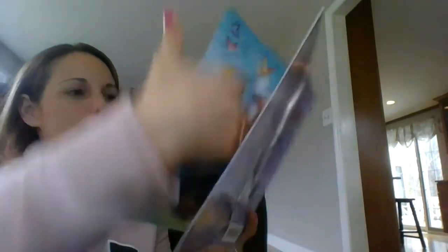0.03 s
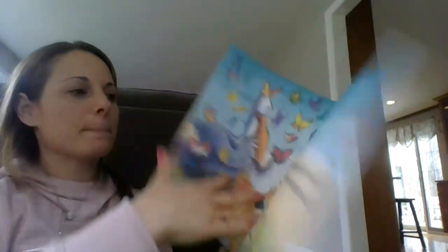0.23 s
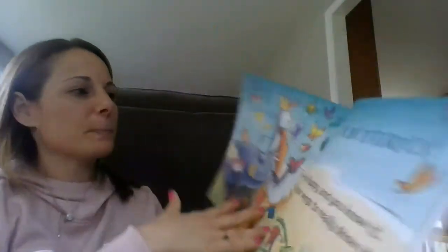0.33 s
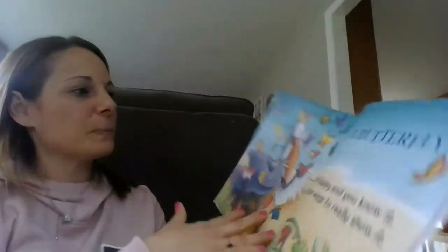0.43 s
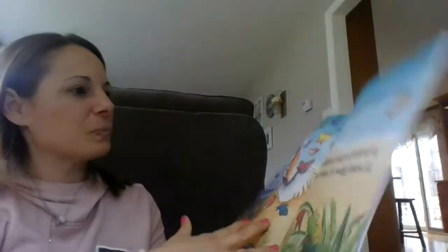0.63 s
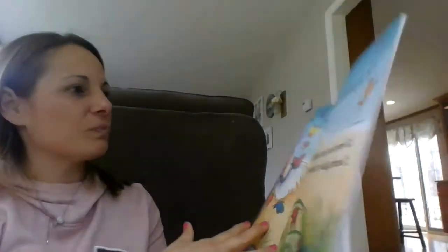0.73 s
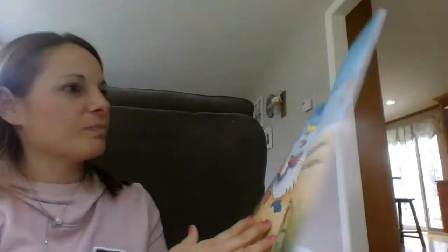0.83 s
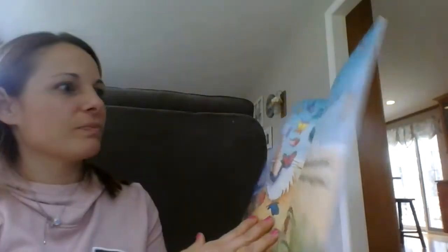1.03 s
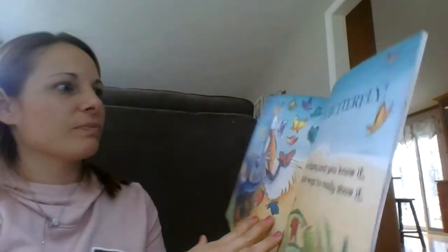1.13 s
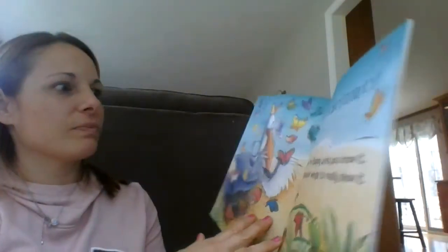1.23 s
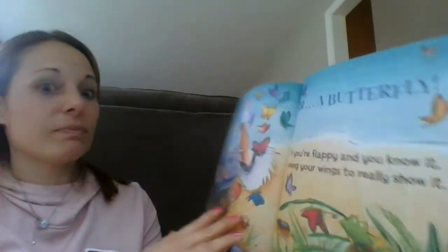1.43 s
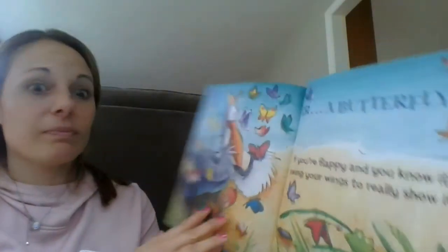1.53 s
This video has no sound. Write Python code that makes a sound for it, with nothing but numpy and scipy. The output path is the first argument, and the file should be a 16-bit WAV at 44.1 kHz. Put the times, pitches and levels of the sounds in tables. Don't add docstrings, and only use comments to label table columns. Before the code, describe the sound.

A stiff, glossy picture-book page turns close to a laptop microphone. Soft crinkling begins at once as it lifts, swelling from 0.2 seconds to a sharp, loud snap near 0.27, with more crackles until it lands with a crisp click at 0.43. By 0.6 only faint palm slides remain, with a light hollow fingertip tap at 0.93 and soft brushes near 1.2 and 1.5, over faint low room rumble.

```python
import sys
import numpy as np
from scipy import signal
from scipy.fft import rfft, irfft, next_fast_len
from scipy.io import wavfile
from scipy.ndimage import uniform_filter1d, map_coordinates

SR = 44100
rng = np.random.default_rng(int(sys.argv[2]) if len(sys.argv) > 2 else 0)


def master(y):
    cut = np.clip(np.atleast_2d(y).T, -1, 1)
    pcm = np.round(cut * 32767)
    wavfile.write(sys.argv[1], SR, pcm.astype(np.int16))


def ratio_of_db(decibels):
    return 10 ** (np.asarray(decibels, float) / 20)


N = 70560

# time_s, level_db
LIFT_BEND = [
    (0.0, -65),
    (0.008, -57.5),
    (0.044, -45),
    (0.072, -51.5),
    (0.084, -53),
    (0.09, -46),
    (0.12, -44.5),
    (0.15, -47),
    (0.19, -55.5),
]
# time_s, level_db
FLIP_BEND = [
    (.19, -51.5),
    (.225, -40),
    (.25, -35),
    (.29, -40),
    (.33, -36.5),
    (.365, -42),
    (.418, -51.5),
    (.452, -46),
    (.57, -100),
]
# freq_hz, level_db
SHEET_SPECTRUM = [(150, -13.5), (300, 4), (750, -2.5), (1450, -6), (2400, 2.5), (4000, -8), (6500, -23),
                  (9000, -33.5)]
GRAINS_PER_S, GRAIN_SPREAD_DB, CLUMP_DB, WASH_DB = 1800, 2.5, 1, -3.5
GRAIN_HZ, GRAIN_OCTAVES, GRAIN_CYCLES = 1356, .4, 3.4
SHEET_FLOOR_HZ = 254.6

# freq_hz, level_db_per_hz
HUM_SPECTRUM = [(18, -33), (30, -11), (108, -7), (256, -19.5), (420, -19), (1360, -25.5), (1720, -20.5),
                (15500, -42.5)]
HUM_DB, HUM_SWING_DB = -81, 1.2
# time_s, level_db
WEIGHT_SHIFT = [(0.0, -68), (0.088, -76), (0.12, -63.5), (0.294, -61.5), (0.356, -72), (0.404, -65.5),
                (0.494, -64), (0.524, -69.5), (0.636, -79.5), (0.676, -70.5), (0.9, -80), (0.958, -71.5),
                (1.078, -81), (1.234, -68.5), (1.3, -87.5), (1.344, -72), (1.368, -99), (1.6, -84.5)]
# freq_hz, level_db
THUD_SPECTRUM = [(20, -13.5), (50, -6.5), (100, -4.5), (150, -14.5), (250, -15), (500, -22), (1200, -25),
                 (2500, -60)]

# full_speed_s, rise_s, fall_s, hiss_db, hold_s
STROKES = [(.01, 0.011, 0.07, -53, 0.099), (0.154, 0.11, 0.0199, -46, 0.012),
           (0.283, 0.091, 0.15, -40, 0.056), (0.4297, .001, .005, -45, 0.0011),
           (0.441, 0.015, 0.0034, -42, .005), (0.472, 0.015, 0.23, -71.5, .01),
           (0.611, 0.041, 0.11, -50, .04), (0.815, 0.039, .11, -57, 0.008),
           (0.941, 0.042, 0.034, -67, 0.089), (1.072, .05, 0.044, -81, .09),
           (1.2, 0.035, 0.13, -55.5, .045), (1.305, .07, 0.03, -57.5, 0.025),
           (1.354, 0.025, 0.17, -69, 0.023), (1.515, 0.085, .1, -52.5, .04), (1.6, 0.049, .1, -62, .01)]
SLOPE_DB, EDGE = 20, 1.05
# freq_hz, level_db
GLOSS_SPECTRUM = [(300, -29.5), (1700, -28), (3300, -15), (5500, -2), (7000, -6), (9000, -1), (15500, 0)]
PATCH_DB = 3
# start_s, length_s, level_db, pitch_hz,
# width_hz
AIR_GAPS = [(.002, 0.026, -55.5, 480, 300), (0.077, 0.18, -58, 524, 298), (0.079, 0.11, -64.5, 174, 70),
            (.149, 0.038, -50, 3700, 1100), (.181, 0.24, -54, 5760, 1200), (0.248, .075, -50, 195, 80),
            (0.268, .19, -47.5, 3900, 1800), (.436, .024, -48.5, 5500, 1500), (0.449, .1, -61, 2900, 1500),
            (.456, 0.073, -62, 4900, 1980), (0.527, .08, -71.5, 3500, 2520), (.586, 0.07, -71.5, 680, 920),
            (.59, .19, -62.5, 2140, 400), (0.594, 0.19, -64, 4260, 1880), (.596, 0.13, -63.5, 2870, 1020),
            (0.659, .11, -67, 64, 33), (0.771, .22, -64, 4450, 702), (.79, 0.1, -72, 2800, 360),
            (.817, .052, -74, 1980, 350), (1.171, .2, -69.5, 5800, 1600), (1.195, 0.11, -80, 2910, 269),
            (1.293, 0.064, -67.5, 5460, 1209), (1.446, 0.17, -69.5, 6700, 2270),
            (1.463, .05, -75, 2740, 220), (1.586, .034, -56, 5670, 940)]
GAP_LEAN, GAP_FLUTTER_DB = .65, 1.5

# start_s, peak_db, pitch_hz, life_cycles, crack_db
SNAPS = [(.008, -42, 3200, 4.5, -4), (0.0264, -34, 934, 4.5, -24), (.039, -34.5, 470, 3.9, -35),
         (0.0915, -29.5, 1850, 4.2, -13), (.142, -28, 1960, 3, -7.5), (0.215, -32.5, 1390, 4.9, -11.5),
         (.230, -26.5, 1420, 9.9, -15), (0.2422, -26, 1307, 3.5, -13.5), (0.2596, -15, 1520, 3, -9.5),
         (.259, -22, 3010, 6.5, -12), (0.4294, -21.5, 1940, 2.9, -14.5), (.2740, -7, 1690, 2.9, -1.5),
         (0.2765, -15, 1900, 2, -9), (.287, -23.5, 1760, 2, -10), (0.3428, -22.5, 1324, 6, -24.5),
         (.360, -28, 4530, 3, -9.5), (.376, -27.5, 2680, 1.1, -3), (0.4297, -19, 3540, 6, -8.5),
         (0.4294, -24.5, 893, 2.2, -28), (.449, -26.5, 807, 3.6, -27), (.462, -40, 755, 12.8, -22),
         (.023, -41.5, 1970, 18, -30), (.052, -41, 700, 4.2, -31), (.1, -36, 890, 5.2, -22)]
# start_s, peak_db, pitch_hz, life_cycles, crack_db
MORE_SNAPS = [
    (.2741, -20, 810, 4.1, -32),
    (0.4333, -28.5, 840, 1.15, -32.5),
]
# start_s, peak_db,
# pitch_hz, life_cycles
CREASES = [(.032, -34.5, 945, 5.2), (0.0427, -31.5, 1310, 2.2), (.048, -40.5, 990, 2.4),
           (0.055, -50, 1170, 2.7), (.0915, -30, 930, 1.6), (.104, -37.5, 820, 3.4), (0.112, -41, 1910, 3),
           (.125, -44, 1020, 4), (.148, -33.5, 1730, 3.6), (.151, -45, 1130, 2.3), (.246, -29, 1430, 4),
           (0.2498, -25, 1791, 4), (0.248, -31, 3000, 5.7), (.266, -25, 1295, 4.7), (.2742, -21, 2694, 3),
           (0.298, -32, 1597, 5), (0.3019, -37, 1628, 5.5), (.307, -29, 787, 4.1), (.316, -31, 1810, 4),
           (.320, -26, 1120, 2.7), (0.3236, -28, 1530, 4.4), (.329, -29.5, 1150, 4.6),
           (.334, -27, 1400, 3.6), (.349, -30, 1270, 3.7), (.355, -36.5, 890, 2.9), (.370, -43.5, 744, 6),
           (.4296, -29.5, 8780, 4), (.4296, -25, 5420, 4), (.476, -46.5, 729, 9.3), (0.51, -60, 1058, 21),
           (0.9383, -37, 1452, 2.5), (0.9471, -41.5, 1400, 2.7), (.953, -43.5, 1204, 2.25),
           (0.962, -45, 1350, 2.6), (.972, -44.5, 1400, 5.2)]
CREASE_CRACK_DB = -16
CRACK_S, CRACK_RISE_S, CRACK_HZ, CRACK_WIDTH_HZ = 0.008, .0004, 3500, 2300
# freq_hz, t60_s
ROOM_DECAY = [(300, 0.11), (1500, .18), (6000, 0.13)]
ROOM_DB = -9

TAP_S, TAP_DB, TAP_RISE_S = .9325, -45.5, 0.0015
# pitch_hz, width_hz, level_db, t60_s
TAP_RINGS = [(1400, 220, -5, 0.26), (835, 140, -9, 0.27), (460, 350, -9, 0.2), (2330, 800, -11, 0.19),
             (201, 96, -18.5, 0.25)]
# pitch_hz, level_db, t60_s
COVER_MODES = [(716, -12.5, 0.31), (820, -16.5, 0.32), (920, 4, 0.032), (1239, -5.5, 0.23), (1350, -4, 0.2),
               (1400, -3.5, 0.18), (1520, 3.5, 0.098)]
COVER_DB = -1
TAP_DAMPED_S, TAP_DAMP_DB_PER_S = 1.061, 500

DIP_HZ, DIP_WIDTH_HZ, DIP_DEPTH, TOP_HZ = 7685, 250, 1, 15800


def unit(x):
    return x / np.sqrt(np.mean(x ** 2) + 1e-20)


def along(points, hz):
    f, v = np.transpose(points)
    return np.interp(np.log(hz + 1), np.log(f + 1), v)


def curve(rows):
    s, db = np.transpose(rows)
    return np.interp(np.arange(N) / SR, s, db, left=-150, right=-150)


def wobble(rate):
    knots = rng.standard_normal(int(N * rate / SR) + 4)
    return map_coordinates(knots, [np.arange(N) * rate / SR])


def filtered(x, response):
    m = next_fast_len(N + SR // 2)
    return irfft(rfft(x, m) * response(np.fft.rfftfreq(m, 1 / SR)), m)[..., :N]


def coloured(x, spectrum):
    return unit(filtered(x, lambda hz: ratio_of_db(along(spectrum, hz)) * (hz > 15)))


def resonance(hz, width_hz):
    return lambda f: 1j * f * width_hz / (hz * hz - f * f + 1j * f * width_hz)


def singing(hz, width_hz):
    return unit(filtered(rng.standard_normal(N), lambda f: resonance(hz, width_hz)(f) ** 2))


def patchy(depth_db):
    z = signal.stft(rng.standard_normal(N + 512), nperseg=256)[2]
    field = uniform_filter1d(rng.standard_normal(z.shape), size=3, axis=0)
    field = uniform_filter1d(field, size=8, axis=1)
    return signal.istft(z * ratio_of_db(depth_db * unit(field)), nperseg=256)[1][:N]


def crinkle():
    draw, pitch, k = rng.random((2400, 3)), rng.standard_normal(2400), np.arange(400)
    span_s = FLIP_BEND[-1][0]
    live = draw[:, 2:] < GRAINS_PER_S / 4000
    level = live * ratio_of_db(-GRAIN_SPREAD_DB * np.log(1 - draw[:, 1:2]).clip(-3))
    cycles = k / SR * GRAIN_HZ * 2 ** (GRAIN_OCTAVES * pitch[:, None])
    rings = level * cycles * np.exp(-4 * cycles / GRAIN_CYCLES) * np.sin(2 * np.pi * cycles)
    at = (draw[:, :1] * span_s * SR).astype(int) + k
    grains = np.bincount(at.ravel(), rings.ravel(), N)[:N]
    grains /= np.sqrt(np.sum(grains ** 2) / (span_s * SR))
    wash = ratio_of_db(WASH_DB) * coloured(rng.standard_normal(N), SHEET_SPECTRUM)
    clumps = ratio_of_db(CLUMP_DB * wobble(90))
    return (grains + wash) * clumps * (ratio_of_db(curve(LIFT_BEND)) + ratio_of_db(curve(FLIP_BEND)))


def floor():
    hum = ratio_of_db(HUM_DB + HUM_SWING_DB * wobble(3.8)) * coloured(rng.standard_normal(N), HUM_SPECTRUM)
    rumble_gain = ratio_of_db(curve(WEIGHT_SHIFT) + 0.42 * wobble(24))
    return hum + rumble_gain * coloured(rng.standard_normal(N), THUD_SPECTRUM)


def palm():
    t = np.arange(N) / SR
    speed, gaps = np.zeros(N), np.zeros(N)
    for s, rise, fall, db, hold in STROKES:
        off_peak = (s - t).clip(0) / rise + (t - s - hold).clip(0) / fall
        speed += ratio_of_db(db - SLOPE_DB * off_peak ** EDGE)
    hiss = speed * ratio_of_db(1.5 * wobble(40)) * coloured(patchy(PATCH_DB), GLOSS_SPECTRUM)
    for s, length, db, hz, width_hz in AIR_GAPS:
        phase = ((t - s) / length).clip(0, 1)
        swell = np.sin(np.pi * phase ** GAP_LEAN).clip(0) ** 0.74
        gaps += ratio_of_db(db + GAP_FLUTTER_DB * wobble(50)) * swell * singing(hz, width_hz)
    return hiss + gaps


def snaps():
    rings, cracks, t = np.zeros(N + SR), np.zeros(N + SR), np.arange(SR // 10) / SR
    creases = [(*row, CREASE_CRACK_DB) for row in CREASES]
    for s, db, hz, cycles, crack_db in [*SNAPS, *MORE_SNAPS, *creases]:
        start = round(s * SR)
        u = t * hz / cycles * 4
        rings[start:][:len(t)] += ratio_of_db(db) * u * np.exp(1 - u) * np.sin(2 * np.pi * hz * t)
        decay = ratio_of_db(db + crack_db + 7.5 - 60 * t / CRACK_S)
        attack = 1 - np.exp(-t / CRACK_RISE_S)
        cracks[start:][:len(t)] += decay * attack * rng.standard_normal(len(t))
    return rings[:N] + filtered(cracks[:N], lambda f: resonance(CRACK_HZ, CRACK_WIDTH_HZ)(f) ** 2)


def room(x):
    hz, t, z = signal.stft(rng.standard_normal(SR // 2), SR, nperseg=256)
    decay = ratio_of_db(-60 * t / along(ROOM_DECAY, hz)[:, None])
    tail = signal.istft(z * decay, SR, nperseg=256)[1]
    delayed = np.pad(x, (90, 0))
    return signal.fftconvolve(delayed, tail / np.linalg.norm(tail))[:N]


def tap():
    t = (np.arange(N) / SR - TAP_S).clip(0)
    rattle, cover = np.zeros(N), np.zeros(N)
    for hz, width_hz, db, t60 in TAP_RINGS:
        rattle += ratio_of_db(db - 60 * t / t60) * singing(hz, width_hz)
    rattle *= ratio_of_db(2.2 * wobble(150))
    for hz, db, t60 in COVER_MODES:
        cover += ratio_of_db(COVER_DB + db - 60 * t / t60) * np.sin(2 * np.pi * hz * t)
    attack = 1 - np.exp(-t / TAP_RISE_S)
    damping = ratio_of_db(-TAP_DAMP_DB_PER_S * (t + TAP_S - TAP_DAMPED_S).clip(0))
    return ratio_of_db(TAP_DB) * attack * (rattle + cover) * damping


def scene():
    clicks = snaps()
    sheet = crinkle() + clicks + ratio_of_db(ROOM_DB) * room(clicks)
    sheet = filtered(sheet, lambda f: (1j * f / (SHEET_FLOOR_HZ + 1j * f)) ** 2)
    return (sheet + palm() + tap() + floor())[None]


def roll_off(x):
    return signal.sosfilt(signal.butter(12, 16380, fs=SR, output="sos"), x)


def record(dry):
    def chain(hz):
        dip = np.clip(DIP_DEPTH, 0, 1) * np.exp(-((hz - DIP_HZ) / DIP_WIDTH_HZ) ** 2)
        return (1 - dip) * (hz < TOP_HZ)
    return roll_off(filtered(dry, chain))


dry = scene()
out = record(dry)
master(out)
```